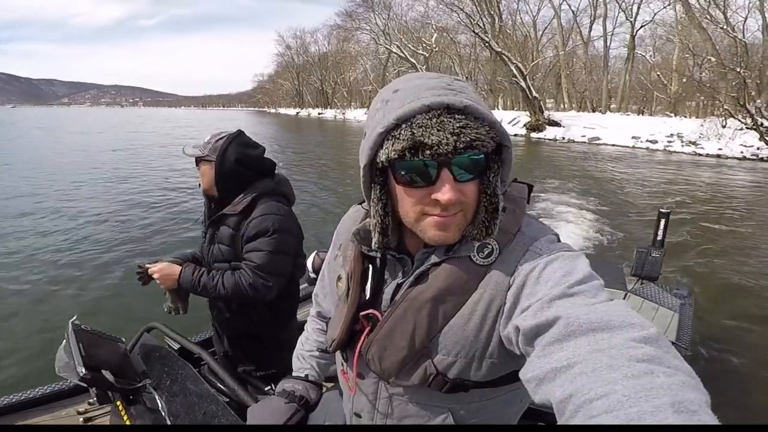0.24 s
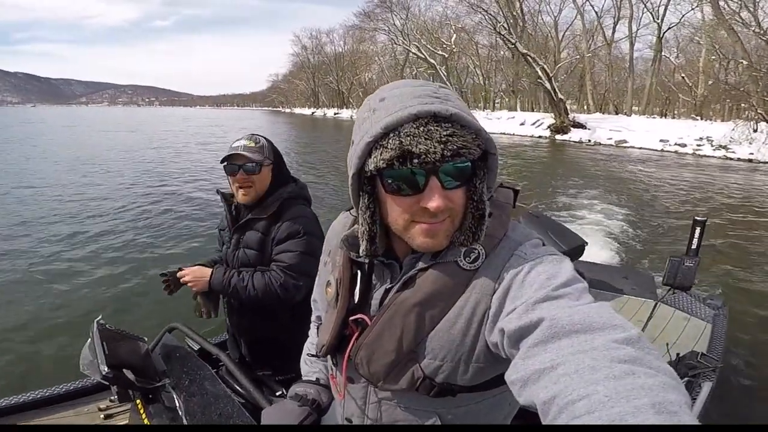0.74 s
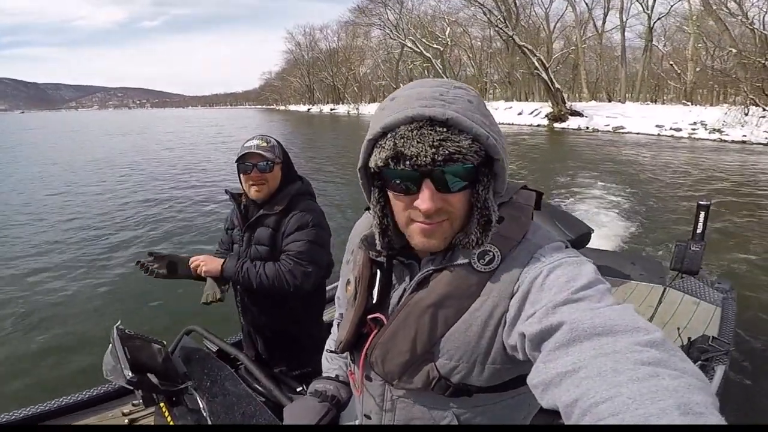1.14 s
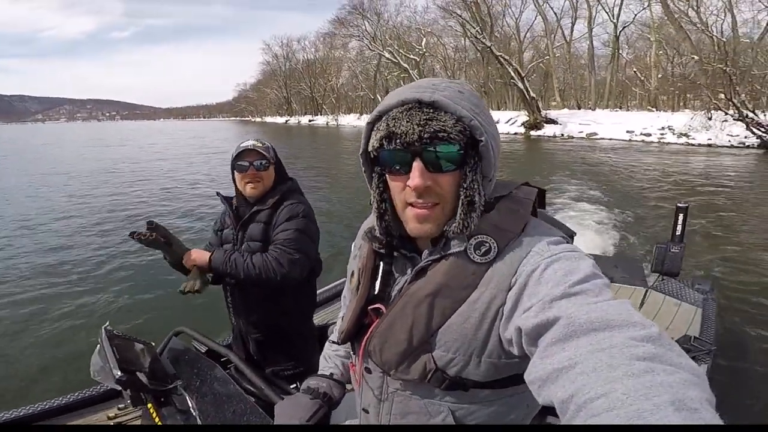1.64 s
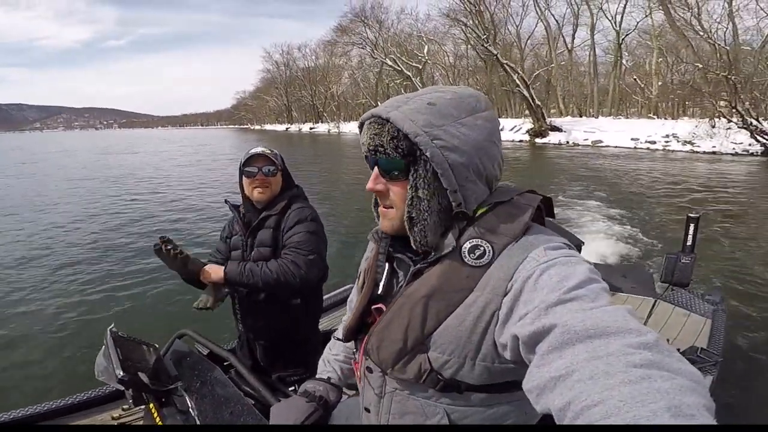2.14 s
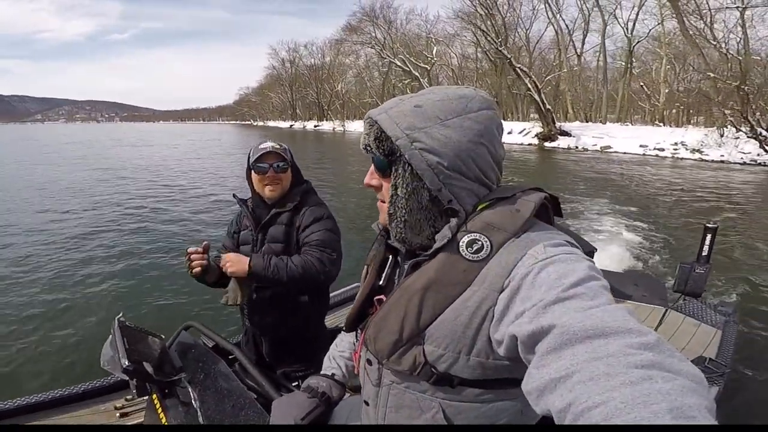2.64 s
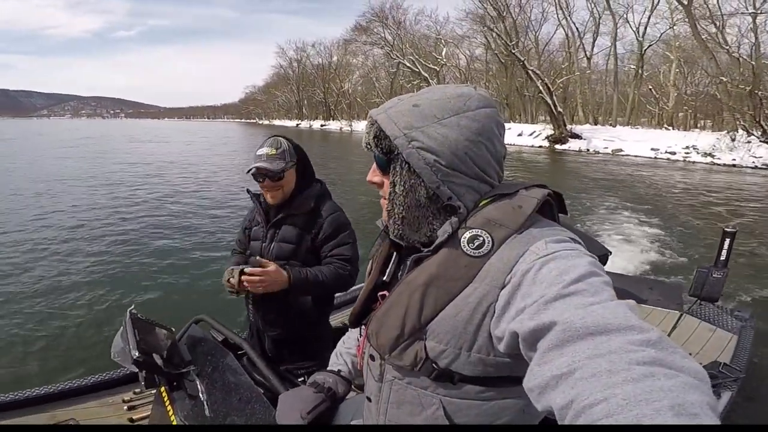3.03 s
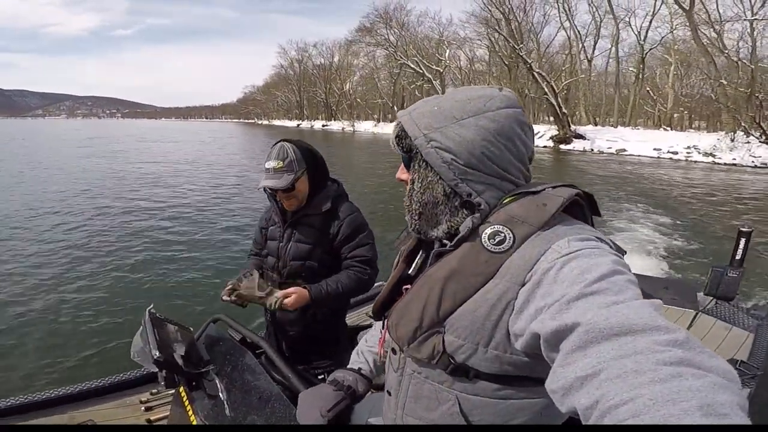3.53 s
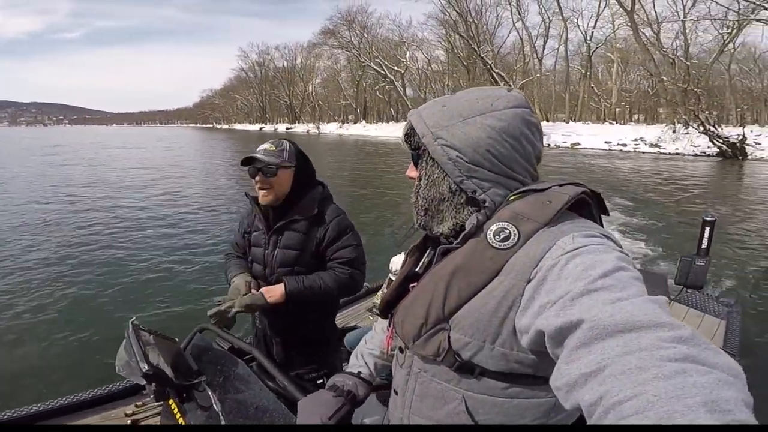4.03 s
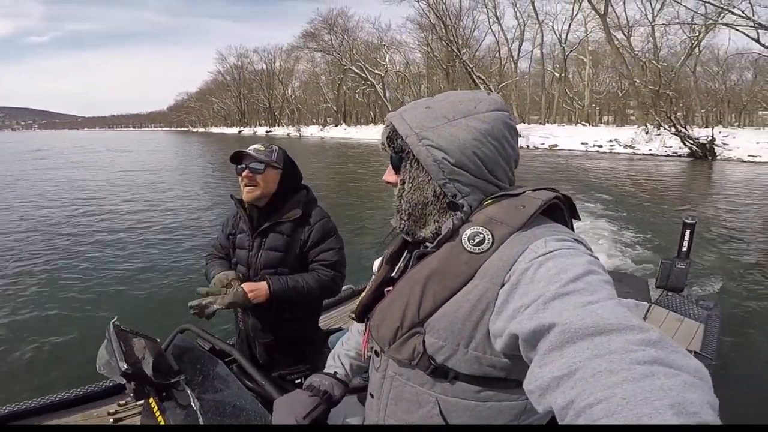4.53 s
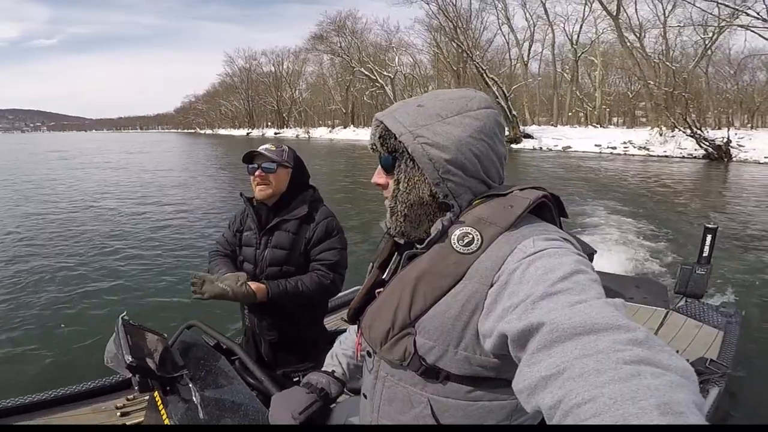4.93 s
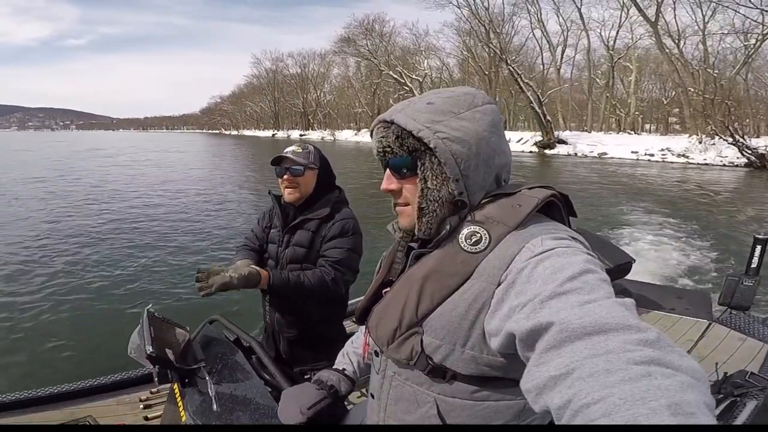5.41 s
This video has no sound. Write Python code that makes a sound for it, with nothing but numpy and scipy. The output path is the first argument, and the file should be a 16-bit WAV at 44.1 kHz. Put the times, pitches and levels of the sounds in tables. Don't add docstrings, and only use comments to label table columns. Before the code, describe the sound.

Continuous low motor buzz heard close up from on board, with hull panels resonating and a wavering metallic singing above. Behind it is a smooth rumble and soft hiss of jet wash and spray. Low wind thumps swell, strongest around 4.6 seconds. One muffled handling bump occurs early, faint cloth ticks around two seconds, and a light fabric rustle after five. Outdoors, mono, no echo.

```python
import sys
import numpy as np
from scipy import signal
from scipy.fft import rfft, irfft, next_fast_len
from scipy.io import wavfile

SR = 44100
rng = np.random.default_rng(int(sys.argv[2]) if len(sys.argv) > 2 else 0)


def volts_from_decibels(level):
    exponent = np.asarray(level, float) / 20
    return 10 ** exponent


def generate_wav(sig):
    pcm = np.round(np.clip(np.atleast_2d(sig).T, -1, 1) * 32767).astype(np.int16)
    wavfile.write(sys.argv[1], SR, pcm)


N = 250047

# [t/s, crank speed/turns per s]
THROTTLE = [(0, 25.9), (.13, 26.05), (.4, 27.1), (.62, 26.75), (.8, 27.25), (.93, 26.65), (1.36, 26.75),
            (1.49, 27.2), (1.7, 26.7), (1.88, 27.3), (2.0, 26.95), (2.26, 27.4), (2.42, 27.0), (2.65, 27.4),
            (3.4, 27.05), (4.5, 27.3), (4.7, 26.9), (5.67, 27.65)]


def throttle():
    speed, = in_time(THROTTLE)
    return 2 * np.pi * (np.cumsum(speed) / SR + .45)


# [multiple of crank speed, level/dB rms]
CRANK_ORDERS = [(1, -43), (2, -45), (3, -65.5), (4, -35.0), (5, -35.0), (7, -44.5), (8, -46.5), (9, -46.5),
                (10, -45.5), (11, -41), (12, -39), (13, -36), (14, -68), (15, -55), (16, -41.5), (17, -90),
                (18, -44), (19, -50), (20, -75), (21, -53.5), (22, -61), (23, -52)]
# [multiple of crank speed, level/dB rms]
CLATTER_ORDERS = [(24, -59), (30, -59.5), (33, -70), (34, -57.5), (36, -62.5), (39, -61.5), (42, -58),
                  (43, -75), (45, -63.5), (46, -62.5), (49, -59.5), (51, -61.5), (57, -66), (60, -62.5),
                  (64, -67)]
# [multiple of shaft speed, level/dB rms]
PUMP_SHAFT_ORDERS = [(3, -41), (14, -52.5), (16, -51), (17, -49), (20, -58), (21, -55.5), (22, -51),
                     (23, -49), (26, -52), (27, -54), (28, -52)]
PUMP_RATIO = .9855


def firing(crank, sixth_db, panel_db, beats):
    beat = 2 * np.pi * beats
    sixth = 6 * crank - 1.2
    boom = volts_from_decibels(sixth_db) * np.cos(sixth) + volts_from_decibels(panel_db) * np.cos(sixth + beat)
    boom *= 1 + 0.079 * np.cos(beat)
    lines = orders(crank, CRANK_ORDERS, waver_db=1.8, slip=0.054, spread=0.0552)
    low = sum(line * loaded(27 * k) for line, (k, db) in zip(lines, CRANK_ORDERS))
    clatter = orders(crank, CLATTER_ORDERS, waver_db=4.0, slip=0.034, spread=.3).sum(axis=0)
    pump = orders(PUMP_RATIO * crank, PUMP_SHAFT_ORDERS, waver_db=2.5, slip=0.011, spread=.3).sum(axis=0)
    return np.sqrt(2) * boom + low + clatter + pump


# [t/s, joint level/dB, panel over sixth level/dB]
IN_STEP = [(.08, -29.5, -10), (.357, -24, 2), (.506, -23.5, -6), (.668, -23.5, -19), (.846, -24.5, -11),
           (1.028, -23, -11), (1.249, -23, 7), (1.365, -28.5, 2), (1.48, -23.5, -3), (1.593, -22, -5),
           (1.727, -28.5, -6), (2.004, -22.5, -1), (2.142, -21, -3), (2.27, -23, -6), (2.424, -22.5, -5),
           (2.639, -23.6, -5.5), (2.784, -22.5, 7.5), (3.018, -24, 4), (3.234, -26.8, -4),
           (3.516, -25, -4.5), (3.788, -23, -13), (3.948, -25, -11), (4.118, -25.5, -8), (4.241, -23, 9),
           (4.4, -30.5, -2), (4.695, -25.5, 6), (4.793, -29, -1), (5.089, -30, -15), (5.307, -30, 22),
           (5.6, -31.5, 2)]
# [t/s, level/dB]
DAMPED_FLOOR = [
    (1.37, 0),
    (2.35, -16),
    (3.09, -14),
    (3.42, -8),
    (4.48, -8),
    (4.63, -9),
    (5.2, -6),
    (5.44, -11),
]
BEATS_PER_S, LULL_S = 7.4, .04


def throbs():
    s, joint_db, panel_db = np.transpose(IN_STEP)
    gaps = np.diff(s, prepend=s[0])
    counted = np.cumsum(np.maximum(1, np.round(gaps * BEATS_PER_S)))
    joint_db, panel_db, beats = in_time(np.transpose([s, joint_db, panel_db, counted]))
    joint_db = joint_db + bumps(*np.transpose(DAMPED_FLOOR), LULL_S)
    sixth_db = joint_db - 20 * np.log10(1 + volts_from_decibels(panel_db))
    return sixth_db, sixth_db + panel_db, beats


def orders(turn, table, waver_db, slip, spread):
    lines = []
    for k, db in table:
        level = volts_from_decibels(db + waver_db * drift(2.8))
        lines.append(level * np.cos(k * (turn + slip * drift(1.43)) - spread * k * k))
    return np.sqrt(2) * np.array(lines)


# [f/Hz, width/Hz, level/dB rms]
PANELS = [(87.5, 34, -39), (166.8, 18.6, -33.5), (298, 6.9, -41), (356.4, 18, -47.5), (435.1, 32, -44.5),
          (488.8, 16.4, -49), (622.5, 38, -51.5), (724.3, 38, -47), (1034, 34, -55), (1172, 120, -47.5),
          (1271, 19, -55.5), (1620, 17, -61), (1775, 17, -63), (1865, 15, -60.5), (2098, 18, -62),
          (2520, 15, -71), (3073, 59, -70), (3430, 80, -69.5)]


def hull(crank):
    shake = puffs(crank, depth=0.12)
    out = 0
    for hz, width, db in PANELS:
        ring = rms_one(resonance(resonance(shake, hz, width), hz, 2 * width))
        out = out + volts_from_decibels(db + 0.85 * drift(0.57)) * loaded(hz) * ring
    return out


# [t/s, orders 3-5 level/dB, 10-14 level/dB, 15-19 level/dB]
PASSING_WAVELETS = [(.1, 0, 2.5, 2.3), (.5, 0.5, 1.8, 3.2), (.82, -5, -2.2, -7), (1.28, -1, -1.5, 3),
                    (1.45, 0.5, 1, -5), (1.64, -1.5, 3, -.6), (1.81, 1.5, -6.5, -1), (2.02, 3, 3, -5.5),
                    (2.25, 0.8, -0.5, -3.5), (2.45, 1, 1, 2.5), (2.64, -1, 0, -4), (2.87, -1, 0.5, 5),
                    (3.02, -1.5, 1, -4), (3.28, 0.5, -1.2, -5.5), (3.92, 2, -3, 2), (4.09, 3, 0, 2.2),
                    (4.3, 2.5, -1, -0.5), (4.58, -1.2, -3, -2.5), (5.3, 1.8, -0.5, -7), (5.62, -6, 1.5, -3)]
WAVELET_S = 0.098
LOW_LOAD_DB, LOW_EASES_DB_PER_S = 0.54, 0.24
MID_LOAD_DB, UPPER_LOAD_DB, UPPER_EASES_DB_PER_S = -1.5, 2, 0.47
TURN_S, TURN_TAKES_S, SHADED_DB, OPENED_DB = 1.97, .3, -3, 9


def loaded(hz):
    s, low_db, mid_db, upper_db = np.transpose(PASSING_WAVELETS)
    t = np.arange(N) / SR
    turned = np.clip((t - TURN_S) / TURN_TAKES_S, -.5, .5)
    if 70 < hz < 145:
        return volts_from_decibels(LOW_LOAD_DB - LOW_EASES_DB_PER_S * t + bumps(s, low_db, WAVELET_S))
    if 260 < hz < 390:
        return volts_from_decibels(MID_LOAD_DB + bumps(s, mid_db, WAVELET_S))
    if 390 <= hz < 530:
        return volts_from_decibels(UPPER_LOAD_DB - UPPER_EASES_DB_PER_S * t + bumps(s, upper_db, WAVELET_S))
    if 1100 < hz < 1300:
        return volts_from_decibels(turned * (SHADED_DB if hz < 1230 else OPENED_DB))
    return 1


def whine(crank):
    below, main, high = orders(crank, [(37.1, -6), (38.1, -2.5), (53.1, -7)], waver_db=1.5, slip=0.026, spread=.3)
    hiss = rng.standard_normal(N)
    low_ring = volts_from_decibels(-5) * rms_one(resonance(resonance(hiss, 1041, 6.3), 1038.6, 16))
    high_ring = volts_from_decibels(-3) * rms_one(resonance(resonance(hiss, 1443, 22), 1443, 30))
    low_db, high_db = spells()
    return volts_from_decibels(low_db) * (below + main + low_ring) + volts_from_decibels(high_db) * (high + high_ring)


# [start t/s, length/s, low whine level/dB over rest, high whine level/dB over rest]
SINGING = [(.3, 0.32, 9, 3.5), (0.687, 0.21, 11, -4), (1.4, 0.14, 7, -4), (1.78, 0.16, 8, -2),
           (2.154, 0.29, 8.5, -1), (2.503, 0.34, 11, 1), (2.95, 0.16, 4.5, 4), (3.25, 0.2, 8.5, 6),
           (3.58, 0.093, 5, 4), (3.8, 0.16, 13, 3), (4.17, 0.423, 10, 1.5), (4.692, .24, 5.5, 5),
           (5.04, 0.67, 6.5, 2.5)]
LOW_REST_DB, HIGH_REST_DB, SPELL_EDGE_S, WHINE_WAVER_DB = -54.5, -52, 0.089, 0.2


def spells():
    t = np.arange(N) / SR
    low_db, high_db = LOW_REST_DB, HIGH_REST_DB
    for s, length, low_lift_db, high_lift_db in SINGING:
        inside_s = np.minimum(t - s, s + length - t)
        on = np.clip(inside_s / SPELL_EDGE_S + .5, 0, 1)
        low_db = low_db + low_lift_db * on
        high_db = high_db + high_lift_db * on
    return low_db + WHINE_WAVER_DB * drift(15.0), high_db + WHINE_WAVER_DB * drift(5.0)


# [t/s, level/dB]
JET_PUSH = [
    (0, -1.5),
    (.9, 2),
    (2.1, -.5),
    (3.8, -1),
    (5.67, -1),
]
# [f/Hz, level/dB per Hz]
RUMBLE_SPECTRUM = [(30, -20), (50, -9.5), (100, -3), (200, 3.5), (260, -2), (400, -2.5), (560, -12.5),
                   (850, -13), (1300, -15.5), (2000, -29.5), (3500, -43)]
# [f/Hz, level/dB per Hz]
SPRAY_SPECTRUM = [(900, -17), (1500, -0.5), (1970, -6), (2400, -8), (2900, -7.5), (3540, -13),
                  (3900, -15.5), (5000, -18), (7000, -23.5), (8500, -21.5), (9600, -27), (11500, -30),
                  (12500, -32), (15400, -36)]
RUMBLE_DB, SPRAY_DB = -36, -49
SPRAY_FOLLOWS, SPRAY_RUN_UP_DB, RUN_UP_S = .15, -2.5, 0.24


def wake(crank):
    thrust_db, = in_time(JET_PUSH)
    run_up_db = SPRAY_RUN_UP_DB * np.exp(-np.arange(N) / SR / RUN_UP_S)
    rumble_db = RUMBLE_DB + thrust_db
    spray_db = SPRAY_DB + SPRAY_FOLLOWS * thrust_db + run_up_db
    rumble = coloured(puffs(crank, depth=0.023), RUMBLE_SPECTRUM)
    fall = rng.random(N) < 400 / SR
    drop_size = volts_from_decibels(4.9 * np.minimum(rng.exponential(1, N), 3))
    drops = fall * drop_size * rng.choice([-1, 1], N)
    spray = (puffs(crank, depth=0.06) + .3 * drops) * volts_from_decibels(0.25 * drift(18))
    spray = coloured(spray, SPRAY_SPECTRUM)
    return volts_from_decibels(rumble_db + 4) * rumble + volts_from_decibels(spray_db + 1.5) * spray


def puffs(crank, depth):
    gate = 1 + depth * (np.cos(crank) + .9 * np.cos(2 * crank) + .6 * np.cos(3 * crank))
    return rng.standard_normal(N) * gate


# [t/s, level/dB over the mean]
AIR_GUSTS = [
    (.33, 6),
    (.95, 7),
    (1.3, 7),
    (1.75, 6.5),
    (2.02, 3),
    (2.6, 4),
    (3.5, -5),
    (4.65, 11),
    (5.15, -9),
    (5.62, -2),
]
SWELL_DB, BUFFET_DB, GUSTY_DB, GUST_S = -35, -37.5, 2, 0.17


def air():
    swell, buffet = band(2.5, 10), band(10, 26)
    gust_db = bumps(*np.transpose(AIR_GUSTS), GUST_S)
    buffet_db = BUFFET_DB + 0.31 * gust_db + GUSTY_DB * drift(1.0)
    return volts_from_decibels(SWELL_DB + gust_db) * swell + volts_from_decibels(buffet_db) * buffet


# [t/s, peak level/dB, f/Hz]
POLE_KNOCKS = [
    (1.195, -17, 38),
]
# [t/s, peak level/dB, f/Hz]
CLOTH_SNAPS = [(1.893, -60, 9000), (2.1, -56, 11000), (5.072, -57, 7000), (5.172, -62, 13000),
               (5.332, -45, 7000), (5.377, -53, 14000), (5.405, -55, 13000), (5.418, -48, 9000),
               (5.44, -55, 12000), (5.495, -54, 12000), (5.546, -56, 12000)]


def handling():
    t, out = np.arange(N) / SR, 0
    for s, peak_db, hz in POLE_KNOCKS:
        bell = np.exp(-((t - s) / 0.013) ** 2)
        out = out - volts_from_decibels(peak_db) * np.cos(2 * np.pi * hz * (t - s)) * bell
    for s, peak_db, hz in CLOTH_SNAPS:
        burst = rng.standard_normal(N) * np.exp(-np.abs(t - s) / .0012)
        out = out + volts_from_decibels(peak_db + 5) * resonance(resonance(burst + 1e-18, hz, 6000), hz, 6000)
    return out + volts_from_decibels(sleeve() + 1.5 * drift(30)) * band(4200, 11000)


SLEEVE_S, CREEP_S, RUB_ATTACK_S, RUB_HOLD_S, RUB_RELEASE_S = 5.3, .3, 0.033, .1, .07
STILL_DB, CREEP_DB, RUB_DB, AFTER_DB = -70.5, -66, -59, -62


def sleeve():
    s = SLEEVE_S + np.cumsum([-CREEP_S, CREEP_S, RUB_ATTACK_S, RUB_HOLD_S, RUB_RELEASE_S])
    return in_time(np.transpose([s, [STILL_DB, CREEP_DB, RUB_DB, RUB_DB, AFTER_DB]]))[0]


def rms_one(x):
    return x / np.sqrt(np.mean(x ** 2) + 1e-20)


def in_time(rows):
    s, *columns = np.transpose(rows)
    return [np.interp(np.arange(N) / SR, s, c) for c in columns]


def bumps(s, db, width_s):
    t = np.arange(0, N, 64) / SR
    bells = np.exp(-((t[:, None] - s) / width_s) ** 2)
    return np.interp(np.arange(N) / SR, t, bells @ db)


def drift(rate):
    r = np.exp(-80 * np.pi * rate / SR)
    slow = signal.lfilter([1], [1, -2 * r, r * r], rng.standard_normal(N // 40 + 2002))[2000:]
    return np.interp(np.arange(N) / 40, np.arange(len(slow)), rms_one(slow - slow.mean()))


def coloured(x, spectrum):
    hz, db = np.transpose(spectrum)
    size = next_fast_len(N)
    log_hz = np.log(np.arange(size // 2 + 1) * SR / size + 1e-3)
    gain = volts_from_decibels(np.interp(log_hz, np.log(hz), db, left=-150, right=-150))
    return rms_one(irfft(rfft(x, size) * gain, size)[:N])


def resonance(x, hz, width):
    r = np.exp(-np.pi * width / SR)
    poles = [1, -2 * r * np.cos(2 * np.pi * hz / SR), r * r]
    return signal.lfilter([(1 - r * r) / 2, 0, (r * r - 1) / 2], poles, x)


def band(low_hz, high_hz):
    edges = [(low_hz / 2, -20), (low_hz, 0), (high_hz, -2), (1.6 * high_hz, -30)]
    return coloured(rng.standard_normal(N), edges)


def scene():
    crank = throttle()
    engine = firing(crank, *throbs())
    mix = engine + hull(crank) + whine(crank) + wake(crank) + air() + handling()
    return mix[None, :]


def top_cut(x):
    return signal.sosfilt(signal.butter(12, 15220, fs=SR, output="sos"), x)


def record(dry):
    mix = .8 * np.tanh(dry / 0.79)
    return top_cut(mix)


dry = scene()
out = record(dry)
generate_wav(out)
```